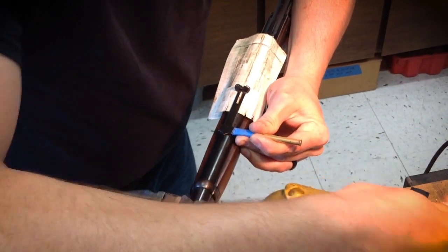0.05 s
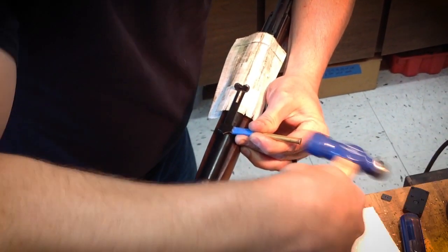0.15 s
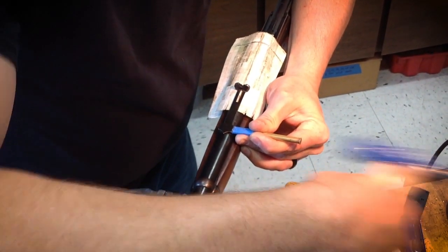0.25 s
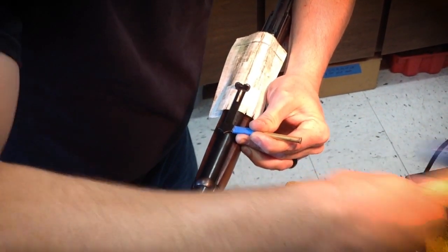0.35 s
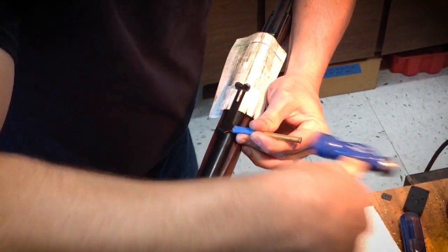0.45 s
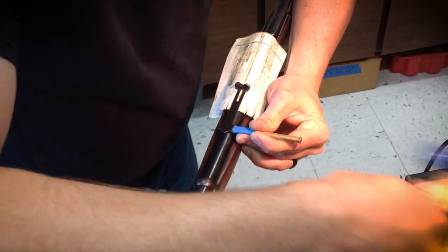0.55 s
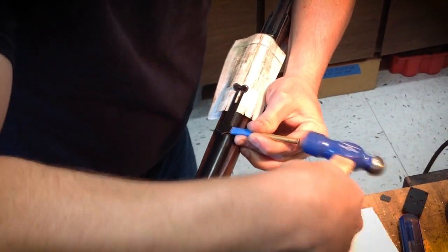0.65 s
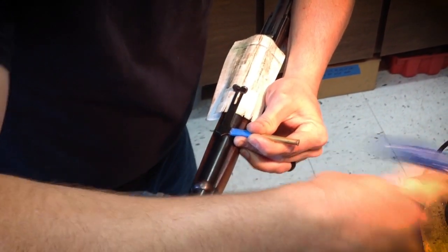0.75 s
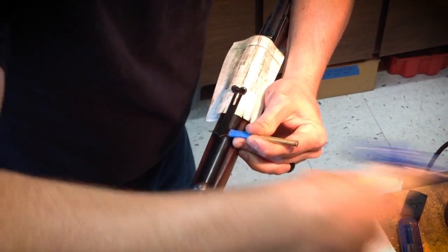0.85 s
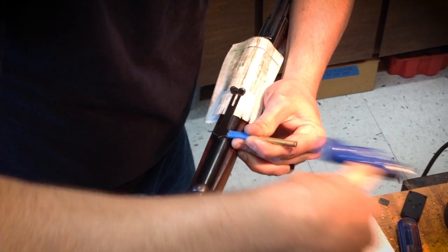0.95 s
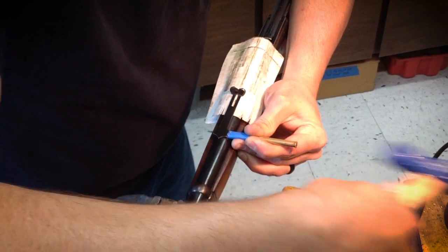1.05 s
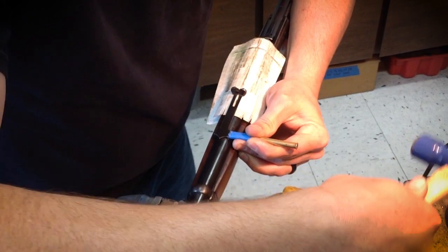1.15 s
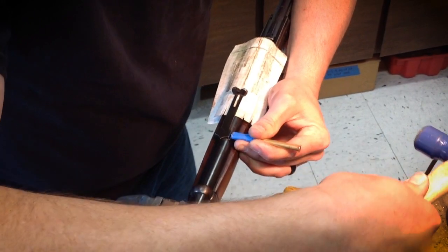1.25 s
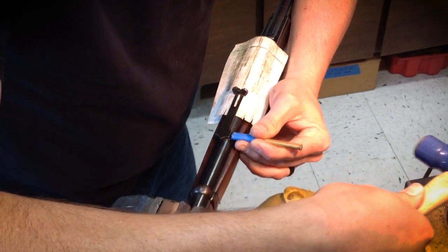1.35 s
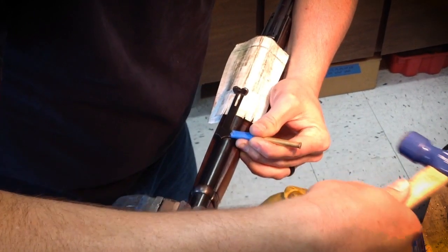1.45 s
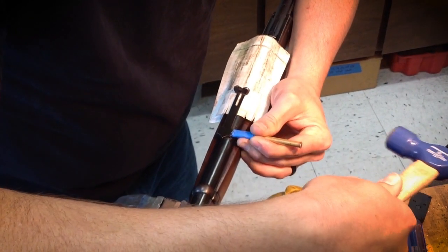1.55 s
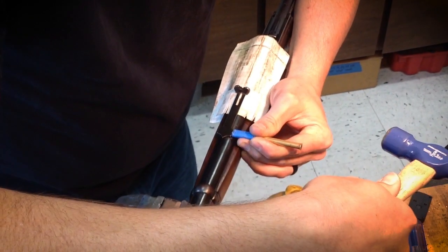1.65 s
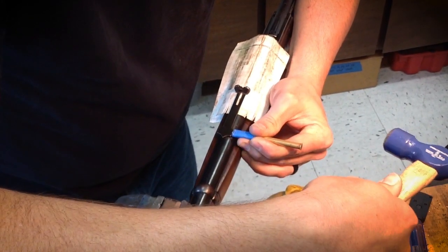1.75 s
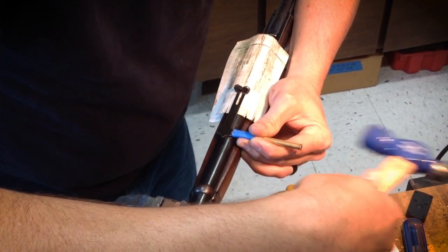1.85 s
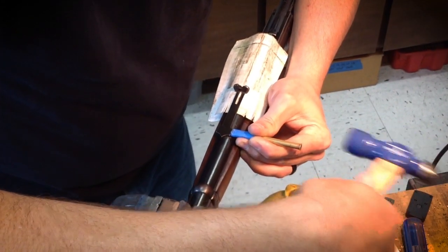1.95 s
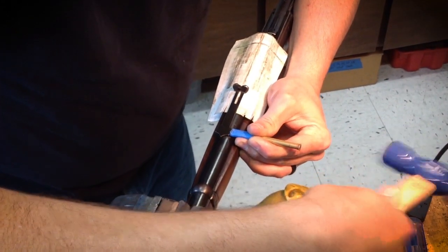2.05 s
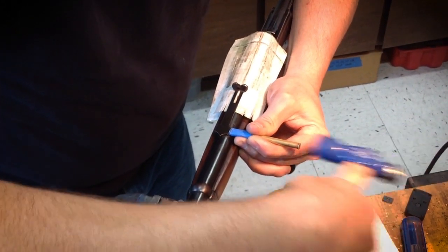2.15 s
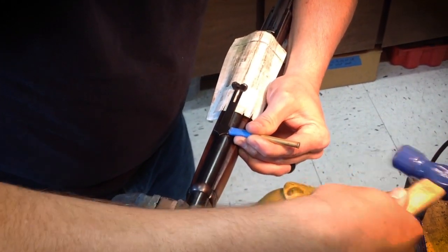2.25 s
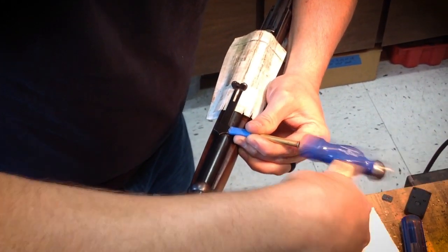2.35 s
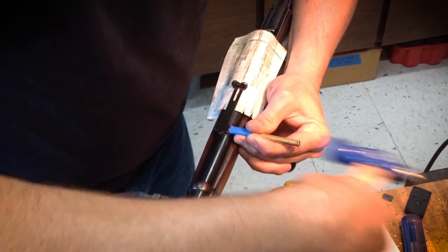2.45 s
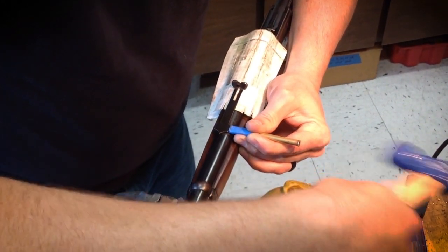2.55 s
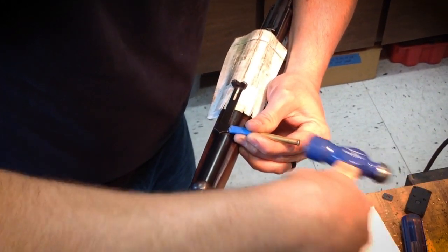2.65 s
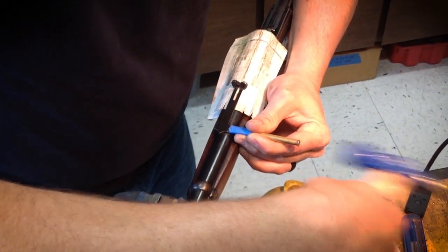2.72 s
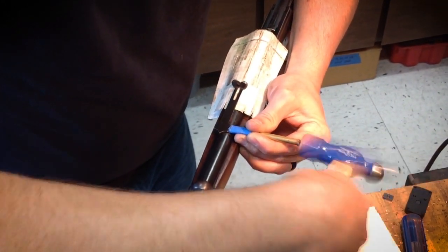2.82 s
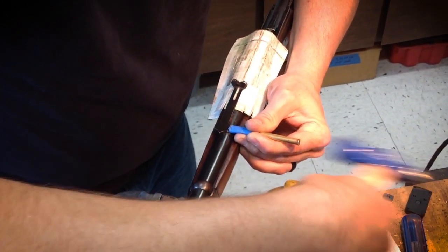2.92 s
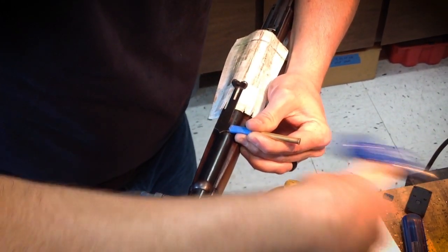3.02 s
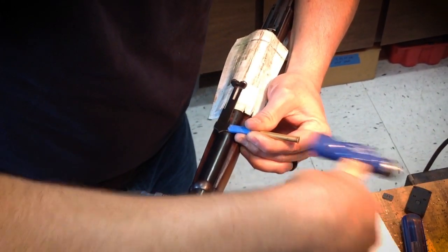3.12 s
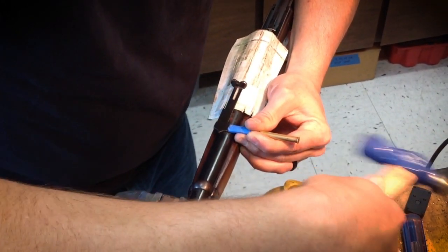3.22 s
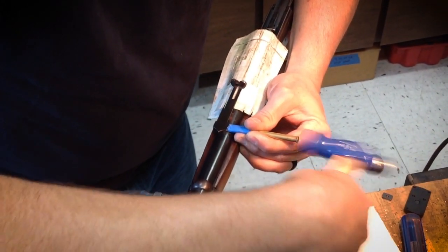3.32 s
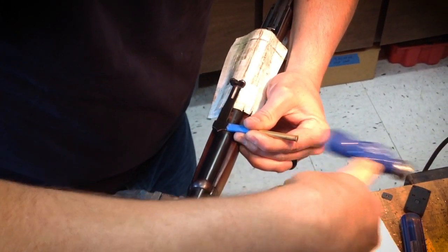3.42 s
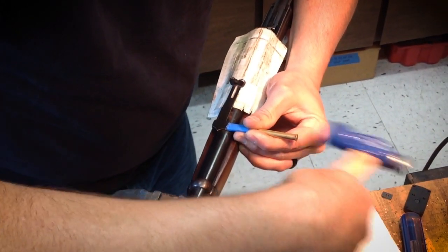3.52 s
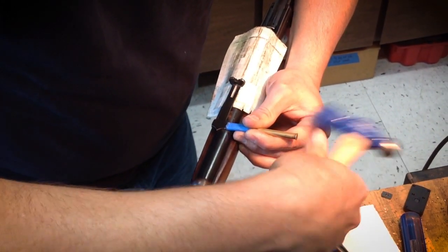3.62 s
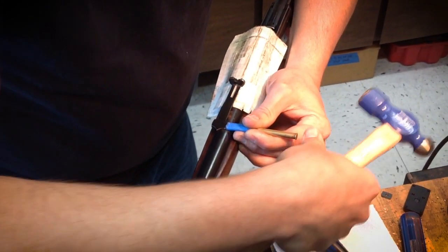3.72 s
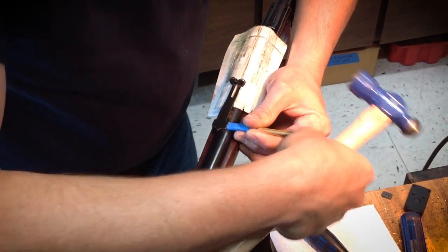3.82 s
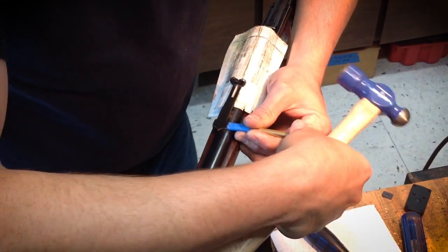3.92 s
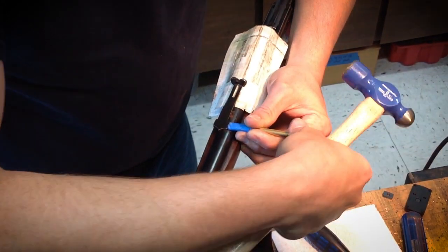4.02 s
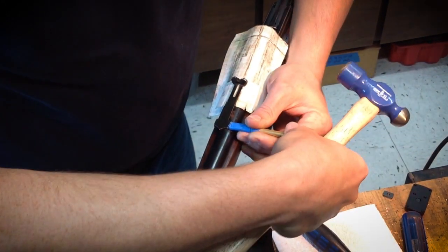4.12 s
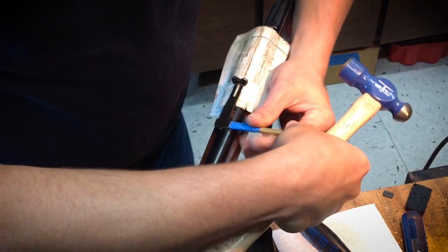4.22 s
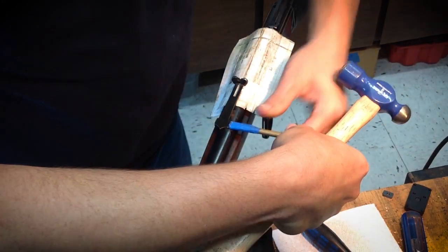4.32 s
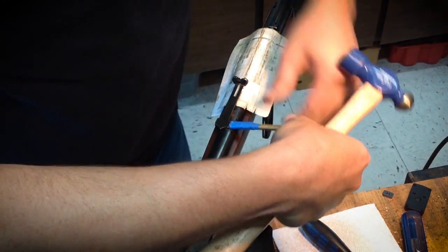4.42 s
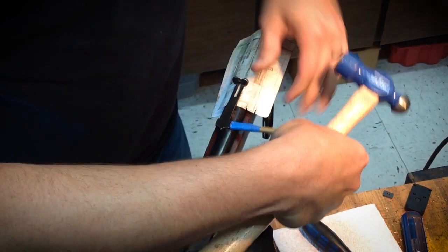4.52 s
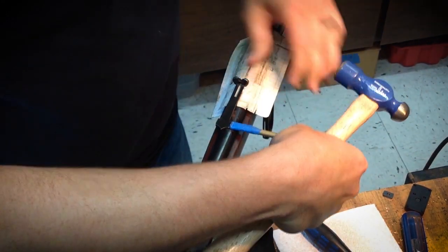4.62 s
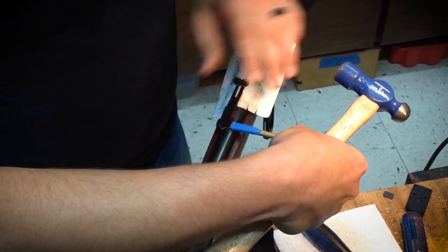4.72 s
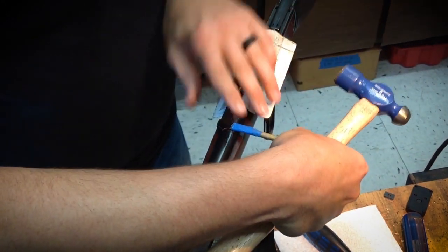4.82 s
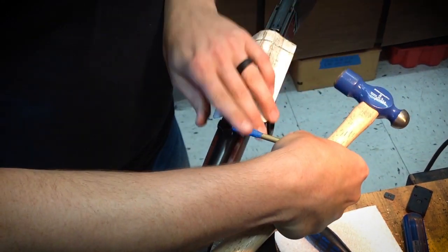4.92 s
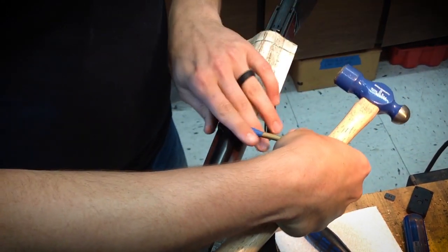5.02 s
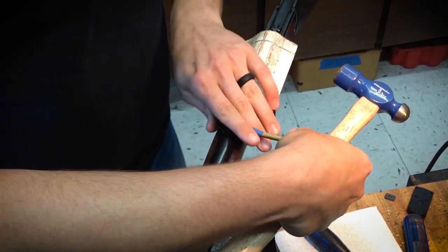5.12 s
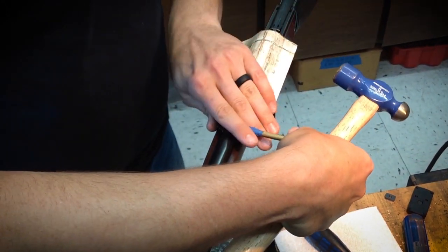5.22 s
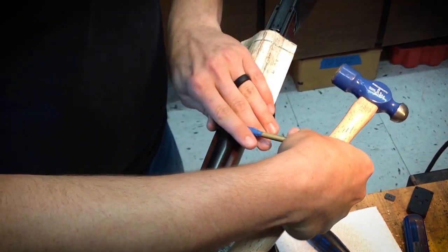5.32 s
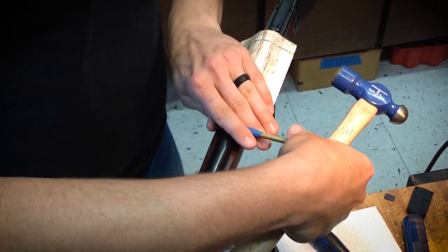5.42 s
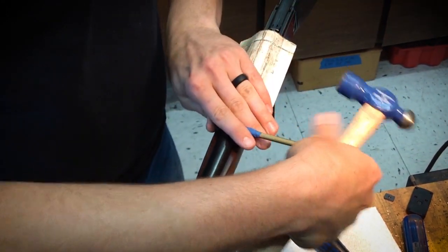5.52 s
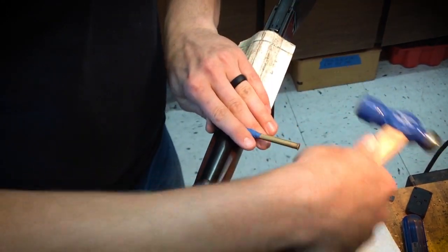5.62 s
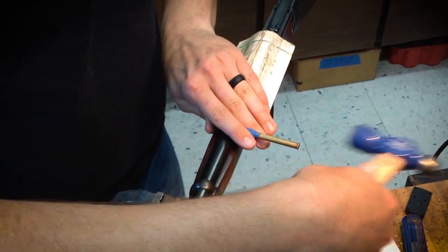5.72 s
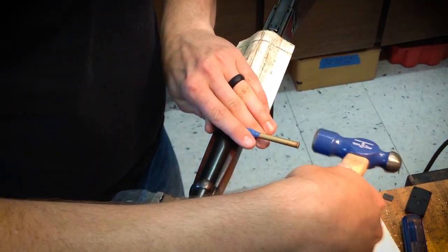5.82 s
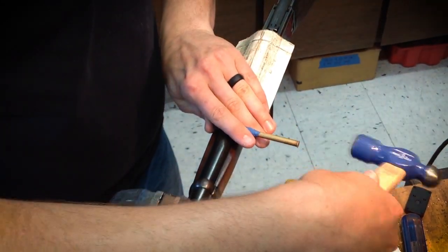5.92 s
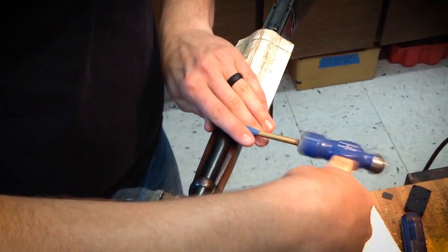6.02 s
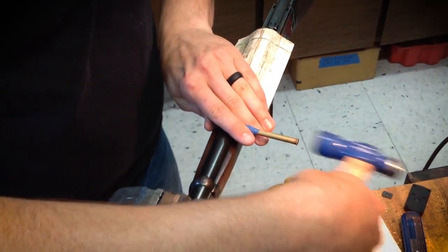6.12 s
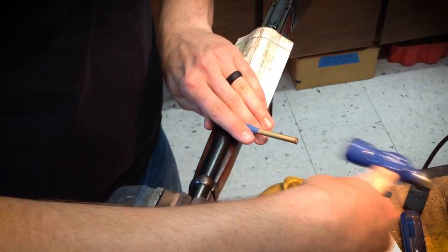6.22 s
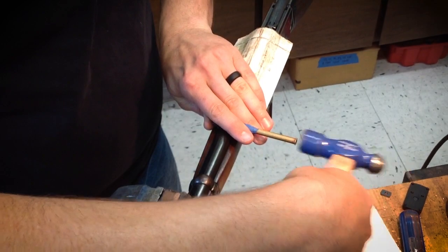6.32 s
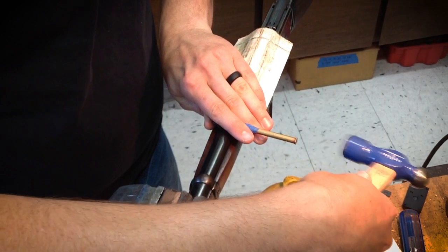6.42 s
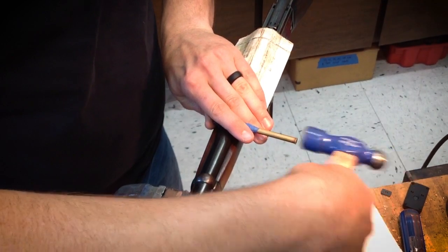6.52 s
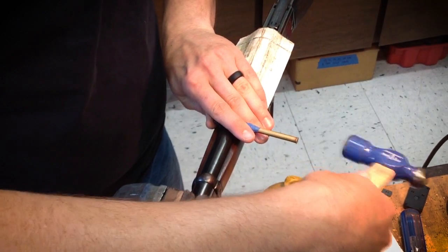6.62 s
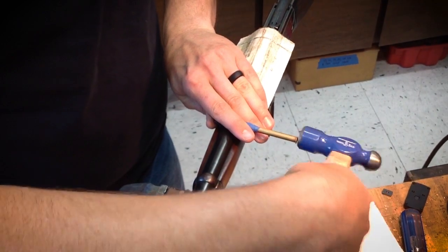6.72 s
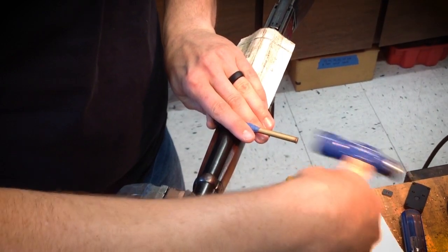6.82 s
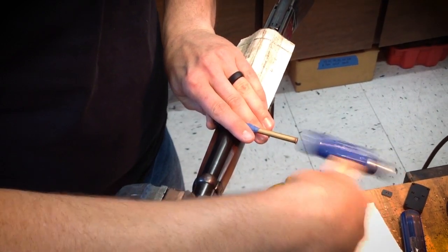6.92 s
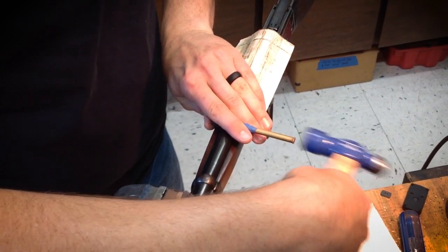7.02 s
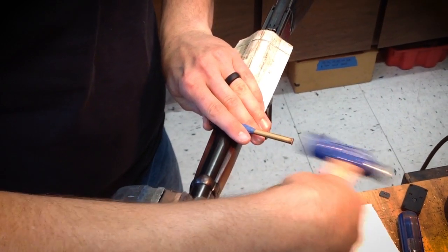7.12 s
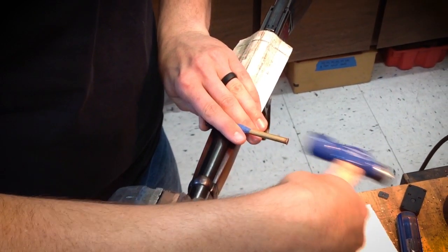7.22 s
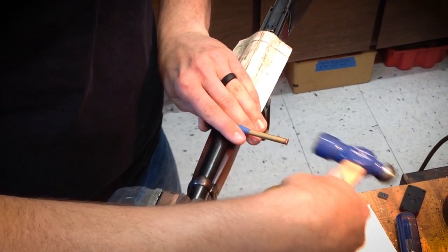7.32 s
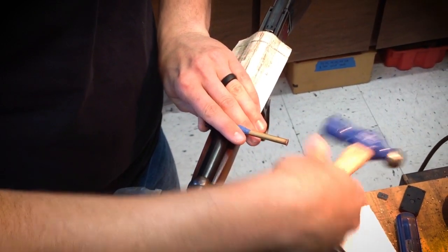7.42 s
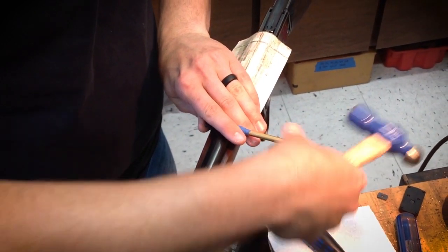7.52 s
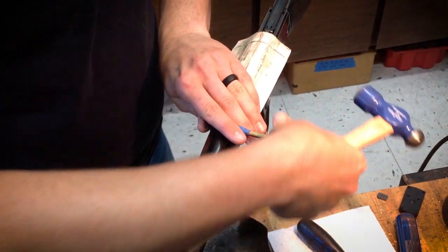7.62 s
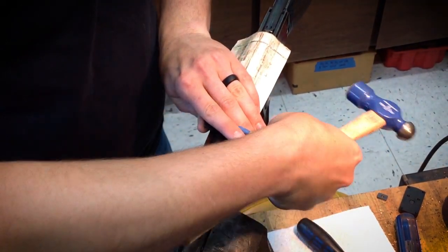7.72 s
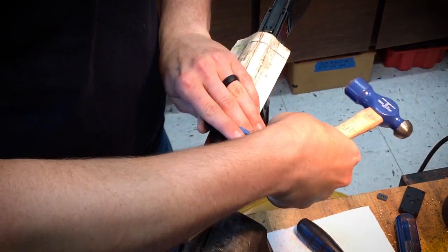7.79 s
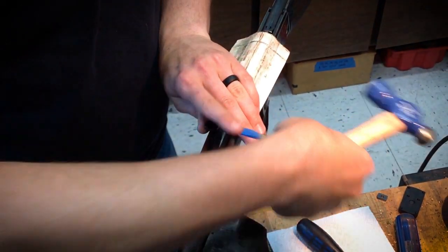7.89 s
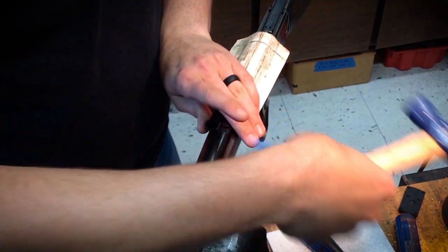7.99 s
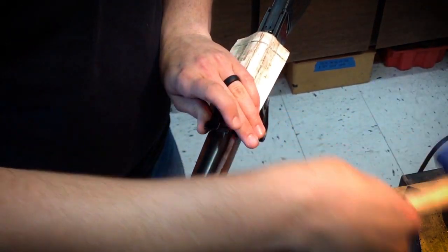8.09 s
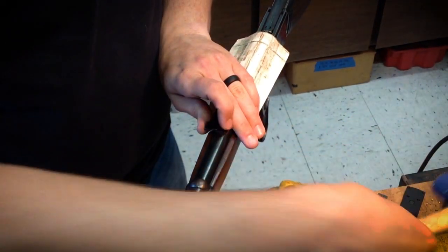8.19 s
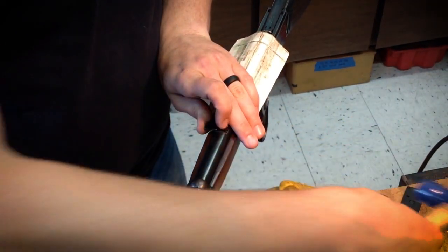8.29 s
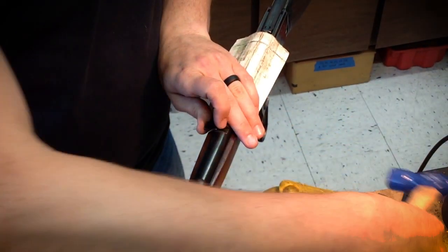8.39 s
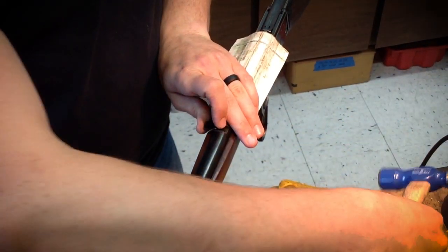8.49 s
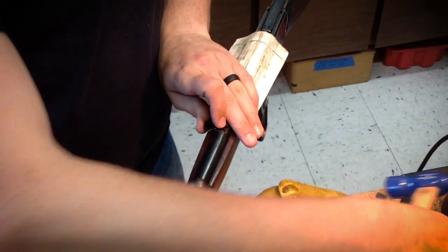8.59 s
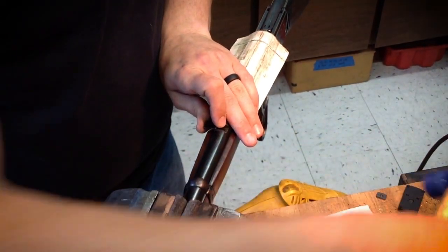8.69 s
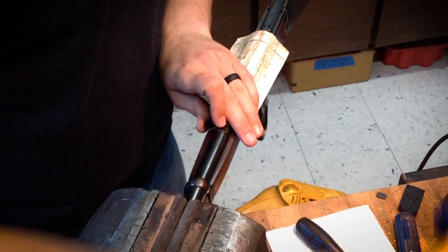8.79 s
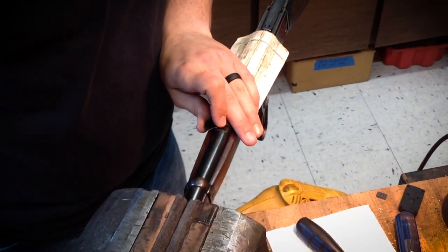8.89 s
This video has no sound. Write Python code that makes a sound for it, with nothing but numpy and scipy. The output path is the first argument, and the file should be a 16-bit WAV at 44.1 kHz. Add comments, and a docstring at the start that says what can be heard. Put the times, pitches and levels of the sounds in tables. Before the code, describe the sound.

Short, bright hammer taps on a steel punch come in three even runs, with light tool handling in a small, dry workshop.

```python
"""In a small dry workshop, a small hammer taps a hand-held metal punch, drifting a part out of its slot
in a barrel held in a vice. Each tap is a dense, very short steel clash over the thud of barrel and bench.
Five hard taps open the scene; after a breath come seven lighter ones. The hands shift and the tools
knock lightly, then a last quick run of six follows. After a few small ticks the hammer is laid down."""
import sys
import numpy as np
from scipy import signal
from scipy.io import wavfile

SR = 44100
rng = np.random.default_rng(int(sys.argv[2]) if len(sys.argv) > 2 else 0)


def unload_audio(sound):
    """Save the sound as a 16-bit wav file, at the path given as the first command line argument."""
    columns = np.transpose(np.atleast_2d(sound))
    # keep every value between -1 and 1, then stretch to whole-number steps
    steps = np.round(np.clip(columns, -1, 1) * 32767)
    wavfile.write(sys.argv[1], SR, steps.astype(np.int16))


N = 394694

# hammer on punch: start_s, strength_db, bench_boom_db, punch_seating_db, barrel_clang_db
TAPS = [(-0.018, 10, -2.5, 3.5, -4.5), (0.2234, 10, -2, 3.5, -5), (0.4715, 8, -3.5, 5, -5),
        (0.7237, 8.5, 0.5, 1.5, -3.5), (0.976, 7.5, -3.5, 2, -4), (2.1914, 1.6, 0.5, 7, 4),
        (2.4413, 1.3, -2, 7.5, 4.5), (2.6748, 4, 0, 3, -3), (2.9077, 2, 2.5, 3.5, 0),
        (3.1405, 0.5, 8.5, -3, 0.5), (3.3822, -2, 8, -3, 0), (3.6147, -10, -13, 3.5, 10),
        (6.111, -4.5, 9.5, -3, 1), (6.3514, -4, 9, -3, 1), (6.564, -1.5, 9, -8.5, -1.7),
        (6.7815, -0.5, 5.5, -9, -4.5), (6.9915, 0, -2.5, -6.5, -6), (7.198, -1.5, -9, -10.3, -5)]
# where a tap's boom, thud (from, to), clang, clack, plain clash and sheen sit: frequency_hz
COLOUR_HZ = [110, 330, 750, 1200, 2200, 5500, 12000]

EDGES = np.geomspace(11, 17000, 27)
CENTRES = np.sqrt(EDGES[1:] * EDGES[:-1])
BANK = [signal.butter(2, edge, "band", fs=SR, output="sos") for edge in zip(EDGES, EDGES[1:])]
NO_SUB_DB = np.where(CENTRES < 40, -60, 0)   # small objects radiate no deep bass
BURST_T, ROOM_T, RING_T, SCENE_T = (np.arange(n) / SR for n in (SR // 8, SR // 3, 3 * SR // 2, N))


def from_db(db):
    return 10 ** (np.asarray(db) / 20)


def at_hz(points, hz):
    """Read a spectrum on a log-frequency axis."""
    f, value = np.transpose(points)
    return np.interp(np.log(hz), np.log(f), value)


def dying(t, t60):
    """Falls by 60 dB in t60."""
    return np.exp(-np.log(1000) * t / t60)


def add(track, s, sound):
    """Mix a sound in from time s."""
    start = round(s * SR)
    first, last = max(start, 0), min(start + len(sound), N)
    track[first:last] += sound[first - start:last - start]


def coloured(noises, band_db):
    """Each band gets its own noise and the energy per Hz that band_db asks for."""
    out = 0
    for sos, noise, db, width in zip(BANK, noises, band_db, np.diff(EDGES)):
        band = signal.sosfilt(sos, noise + 1e-18)
        out = out + band * from_db(db) * np.sqrt(width / np.sum(band ** 2))
    return out


def steady(spectrum):
    """A noise bed of rms 1; neighbouring bands are unrelated."""
    white = rng.standard_normal((2, N))
    noise = coloured([white[k % 2] for k in range(len(BANK))], at_hz(spectrum, CENTRES))
    return noise / np.std(noise)


def burst(band_db, rise_s, t60_s, grain=None):
    """A crowd of heavily damped modes: a noise that swells as the blow spreads, then dies."""
    if grain is None:
        grain = rng.standard_normal((len(BANK), len(BURST_T)))
    swell = 1 - np.exp(-BURST_T / rise_s)
    return coloured(grain * swell * dying(BURST_T, t60_s), band_db + NO_SUB_DB)


def ring(modes, colour_db, t, lag_s=0):
    """Struck modes, each with a slightly different strength on every blow."""
    hz, db, t60 = np.transpose(modes)
    scatter_db = rng.normal(0, 1.5, len(hz))
    t = np.maximum(t - np.reshape(lag_s, (-1, 1)), 0)
    partials = np.sin(2 * np.pi * hz[:, None] * t) * dying(t, t60[:, None])
    return from_db(db + colour_db + scatter_db) @ partials


def contacts(events, spectrum, level_db, rise_s, t60_s):
    """One short burst for each light contact."""
    out = np.zeros(N)
    for s, db in events:
        add(out, s, burst(level_db + db + at_hz(spectrum, CENTRES), rise_s, t60_s))
    return out


def still_air(level_db=-79):
    """Room tone: the still air of the workshop."""
    # colour of the air: frequency_hz, level_db_per_hz
    air = [(12, -17.5), (50, -1), (90, -2.5), (140, -11), (300, -14), (1000, -19), (3000, -26), (9000, -29),
           (12000, -39.5), (16000, -47)]
    return from_db(level_db) * steady(air)


def rumble(rest_db=-50, swing_db=-48.5, db_per_db=0.56, swing_s=.08, settle_t60_s=2.4):
    """Deep rumble that swells with each swing of the arm, more for a hard one, and settles."""
    # colour of the rumble: frequency_hz, level_db_per_hz
    lows = [(12, 7), (18, -7), (28, -31), (55, -39.5), (100, -57), (300, -88.5)]
    power = from_db(rest_db) ** 2
    for s, db, *_ in TAPS:
        age = SCENE_T - s
        swing = np.clip(1 + age / swing_s, 0, 1) * dying(np.maximum(age, 0), settle_t60_s)
        power = power + (from_db(swing_db + db_per_db * db) * swing) ** 2
    return np.sqrt(power) * steady(lows)


def room_tail(band_db, build_s=0.0023):
    """The workshop's answer to this spectrum: reflections build up, then die, the top end first."""
    # reflections against the direct sound: frequency_hz, gain_db
    reflections = [(60, -6), (300, -6), (600, 0.5), (1000, 0.5), (2000, -8), (4000, -8), (7500, -5),
                   (10500, -9.5), (15000, -9.5)]
    # decay of the room: frequency_hz, t60_s
    decay = [(100, 0.21), (600, .31), (1300, 0.33), (3000, 0.3), (7500, 0.3), (11000, 0.2), (15000, .17)]
    build = 1 - np.exp(-(ROOM_T / build_s) ** 2)
    fade = dying(ROOM_T, at_hz(decay, CENTRES)[:, None])
    tails = rng.standard_normal(fade.shape) * build * fade
    return coloured(tails, band_db + at_hz(reflections, CENTRES) + NO_SUB_DB)


def friction(holding_db=-95.5, attack_s=0.03, release_t60_s=0.2, catches_per_s=70, catch_db=2.5):
    """Skin and sleeve slide unevenly, catching and letting go; still hands leave a faint rustle."""
    # changes of grip: start_s, length_s, level_db
    slides = [(1.2, 0.19, -78), (3.724, .15, -66.5), (4.22, 0.16, -78.5), (4.43, .09, -78.5),
              (4.94, 0.14, -78), (5.24, 0.075, -83.5), (7.421, 0.5, -88.5), (8.581, 0.064, -67.5),
              (8.719, 0.039, -74.5)]
    # colour of sliding skin: frequency_hz, level_db_per_hz
    skin = [(100, -6.5), (400, 0.5), (1200, 0), (1800, 4), (2900, -3), (4300, 2), (6000, 0.5), (9500, -8.5),
            (12000, -12), (16000, -20)]
    power = from_db(holding_db) ** 2
    for s, length, db in slides:
        swell = np.clip(1 + (SCENE_T - s) / attack_s, 0, 1)
        release = dying(np.clip(SCENE_T - s - length, 0, 1), release_t60_s)
        power = power + (from_db(db) * swell * release) ** 2
    moments = np.arange(0, N / SR + 1, 1 / catches_per_s)
    catching = np.interp(SCENE_T, moments, rng.standard_normal(len(moments)))
    return np.sqrt(power) * from_db(catch_db * catching) * steady(skin)


def finger_ticks():
    """Fingers and tools touch with small ticks."""
    # touches: start_s, strength_db
    ticks = [(1.483, -47), (1.583, -54), (4.222, -53), (4.318, -58), (4.93, -50.5), (7.478, -55.5),
             (7.538, -53), (7.632, -58), (7.803, -53), (7.905, -51.5), (8.33, -59), (8.535, -55.5)]
    # colour of a tick: frequency_hz, level_db_per_hz
    tick = [(150, 2.5), (600, -3.5), (1700, -3), (4000, -14.5), (9500, -14), (15000, -45)]
    return contacts(ticks, tick, level_db=-26.0, rise_s=0.0005, t60_s=0.03)


def tool_knocks():
    """Punch and hammer handle knock in the hands: a click and a hollow ring."""
    # knocks: start_s, strength_db
    knocks = [(4.037, -19.5), (4.6807, -23), (5.443, -38)]
    # colour of the click: frequency_hz, level_db_per_hz
    click = [(100, -19.5), (400, -28), (1000, 0.5), (2200, 9), (3300, -6), (5000, -11), (8000, -23.5),
             (15000, -56)]
    # hollow ring of the tools: pitch_hz, level_db, t60_s
    modes = [(1140, -22, 0.049), (1488, -34, .025), (1830, -18.5, 0.047), (2278, -9.5, 0.036),
             (3850, -27.5, 0.03)]
    out = contacts(knocks, click, level_db=-39.5, rise_s=0.00041, t60_s=0.011)
    for s, db in knocks:
        add(out, s, ring(modes, db - 6, BURST_T))
    return out


def hammer_laid_down():
    """The hammer meets the bench in three quick, dull contacts."""
    # contacts: start_s, strength_db
    landing = [(8.607, -43.5), (8.628, -23), (8.672, -51)]
    # colour of the bench: frequency_hz, level_db_per_hz
    bench = [(60, -14), (170, -1), (350, -11), (600, -2.5), (1100, 3.5), (1900, -1), (2800, -20),
             (4500, -40), (15000, -47)]
    return contacts(landing, bench, level_db=-27.5, rise_s=0.00073, t60_s=0.029)


def singing_steel(db, db_per_db=1.77):
    """Nearby steel sings on faintly, shaken mainly by the hard blows."""
    # lingering tones: pitch_hz, level_db, t60_s
    modes = [(352, -76, 1.0), (754, -86, 3.0), (766, -84.5, 1.5), (1140, -84, 1.5), (1276, -86, 1.4),
             (1357, -83.5, 1.5)]
    return ring(modes, db_per_db * db, RING_T)


def barrel_ring(db, colour, lag_at_1khz_s=.0017):
    """Bending waves travel with the root of their frequency, so the ringing thud trails the clash."""
    # modes of punch, barrel, vice and bench: pitch_hz, level_db, t60_s
    modes = [(146, -48.5, 0.075), (235, -45, 0.2), (304.2, -37, .12), (325, -42, 0.22), (368.5, -49.5, .31),
             (487, -49.5, 0.12), (852, -56, .28), (1110, -49.5, 0.31), (1163, -47, .37), (1225, -48, .28),
             (1327.3, -33.5, 0.089), (1369, -30.5, 0.06), (2855, -34.5, 0.039), (3439, -29, 0.033),
             (4310, -35, .02), (6780, -28, 0.0055), (7780, -31, .026), (11590, -34.5, 0.04),
             (13650, -33, 0.0097)]
    hz = np.array(modes)[:, 0]
    lag_s = lag_at_1khz_s * np.sqrt(1000 / np.maximum(hz, 300))
    return ring(modes, db + at_hz(colour, hz), ROOM_T, lag_s)


def punch_slam(db, clash_db, full_at_db=9, db_per_db=1.04):
    """A hard blow drives the punch home. Gives the dull slam, the slot's ring and the slam's spectrum."""
    # the slam against the clash: frequency_hz, gain_db
    dulling = [(100, -11.5), (500, -4.5), (2300, 1), (5000, -7), (12000, -14)]
    # the slot's own steel: pitch_hz, level_db, t60_s
    modes = [(2566, -27, 0.029), (5090, -29.5, 0.037), (7400, -28.5, .028)]
    driven_db = db_per_db * min(db - full_at_db, 0)   # light taps hardly move the punch
    slam_db = clash_db + at_hz(dulling, CENTRES) + driven_db
    slot = ring(modes, db + driven_db, BURST_T)
    return burst(slam_db, rise_s=0.00065, t60_s=0.018), slot, slam_db


def tap_colour(boom, seating, clang, loose_clack_db=-2.5, seated_from_db=-2):
    """One tap's EQ curve: a firmly seated punch clacks more, a loose one skitters with a bright sheen."""
    clack = loose_clack_db + 1.0956 * max(seating - seated_from_db, 0)
    sheen = 1.63 - 0.18 * seating
    return list(zip(COLOUR_HZ, [boom, seating, seating, clang, clack, 0, sheen]))


def hammer_taps(echo, base_t60_s=.017, treble_damping=.2, longer_per_db=0.17, slam_lag_s=0.003):
    """Hammer on punch: a steel clash, the slam a moment later, ringing steel and the room."""
    # crowded, hand-damped modes of punch, hammer and slot: frequency_hz, level_db_per_hz
    clash_spectrum = [(45, -13.5), (100, -5.5), (200, -4.5), (340, 3), (550, -8.5), (850, -7.5), (1300, -1),
                      (1900, -1.92), (3000, -1.5), (5200, -0.24), (7500, 2.5), (10300, -8.5), (13500, -2.5),
                      (16000, -15.5)]
    alike = .5   # shared grain: the same parts are struck each time, at a slightly new spot
    mirrored = .6   # share of the tail with the clash's fine colour; the rest left in other directions
    out = np.zeros(N)
    steel = rng.standard_normal((len(BANK), len(BURST_T)))
    band_t60 = base_t60_s * (CENTRES[:, None] / COLOUR_HZ[-2]) ** -treble_damping
    for s, db, boom, seating, clang in TAPS:
        colour = tap_colour(boom, seating, clang)
        grain = np.sqrt(alike) * steel + np.sqrt(1 - alike) * rng.standard_normal(steel.shape)
        clash_db = db - 39.5 + at_hz(clash_spectrum, CENTRES) + at_hz(colour, CENTRES)
        chatter_t60 = band_t60 * np.exp(longer_per_db * db)   # hard blows chatter longer
        clash = burst(clash_db, rise_s=0.00017, t60_s=chatter_t60, grain=grain)
        slam, slot, slam_db = punch_slam(db, clash_db)
        add(out, s, clash)
        add(out, s + slam_lag_s, slam + slot)
        add(out, s, barrel_ring(db, colour))
        add(out, s, singing_steel(db))
        room_send = clash + from_db(-3) * slot
        add(out, s, np.sqrt(mirrored) * signal.fftconvolve(room_send, echo))
        scattered = np.hypot(np.sqrt(1 - mirrored) * from_db(clash_db), from_db(slam_db))
        add(out, s, room_tail(20 * np.log10(scattered)))
    return out


def scene():
    """Taps and handling over friction, air and rumble."""
    echo = room_tail(0) / np.sqrt(SR / 2)   # the room's answer to a single click
    bed = still_air() + rumble()
    taps = hammer_taps(echo)
    handling = tool_knocks() + finger_ticks() + hammer_laid_down()
    handling_room = from_db(-2) * signal.fftconvolve(handling, echo)[:N]
    return (taps + handling + handling_room + friction() + bed)[None]


def record(dry):
    """The hardest taps overload the microphone; the top end is cut."""
    ceiling, cutoff_hz = .6, 16400
    saturated = ceiling * np.tanh(dry / ceiling)
    return signal.sosfilt(signal.cheby2(16, 70, cutoff_hz, fs=SR, output="sos"), saturated)


dry = scene()
out = record(dry)
unload_audio(out)
```